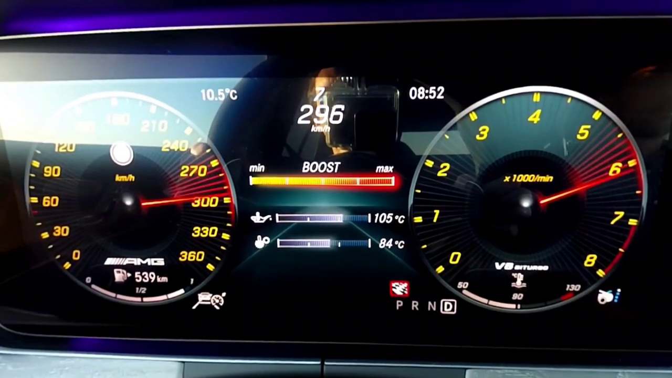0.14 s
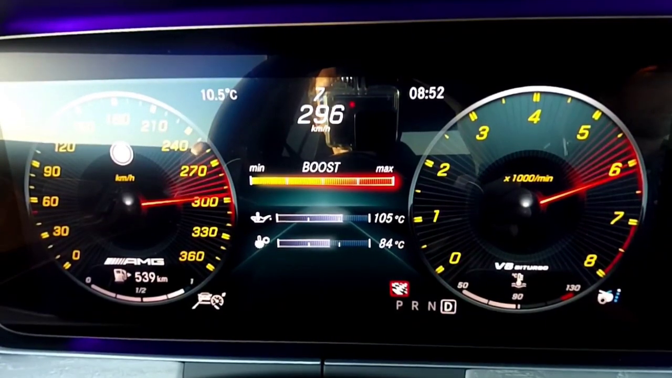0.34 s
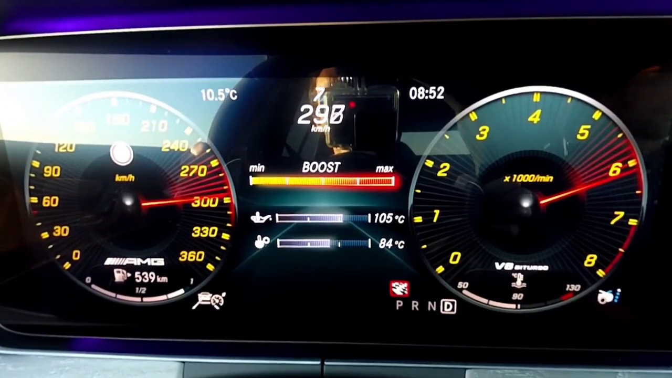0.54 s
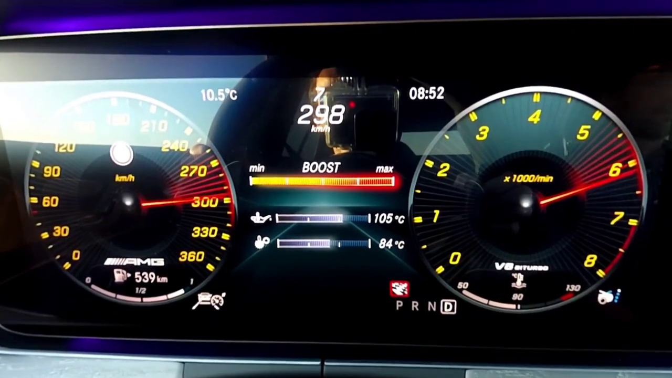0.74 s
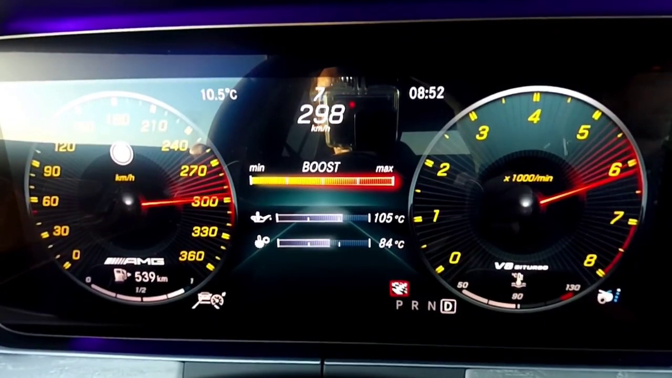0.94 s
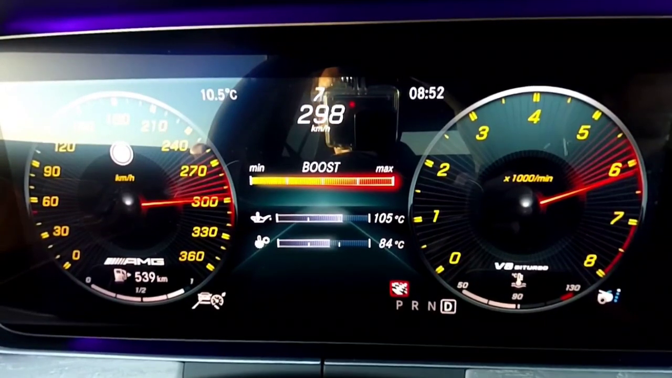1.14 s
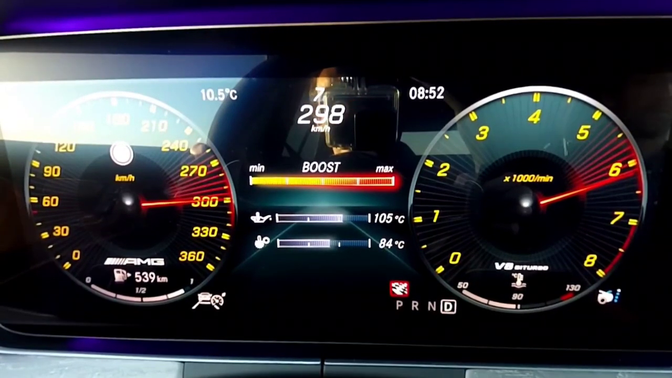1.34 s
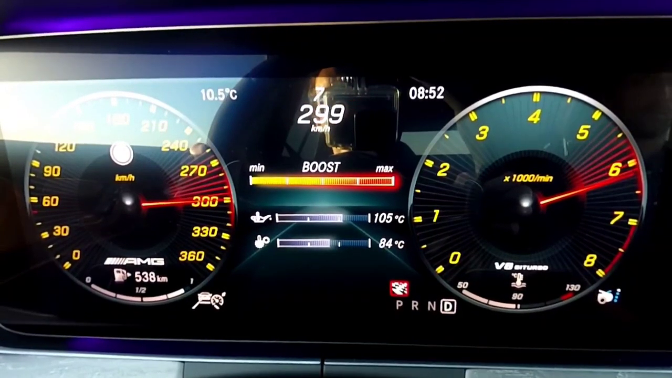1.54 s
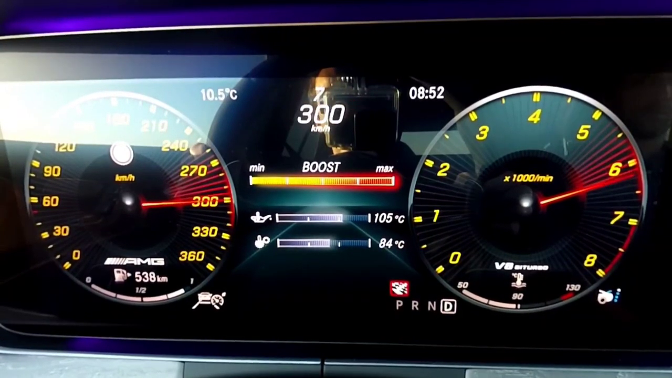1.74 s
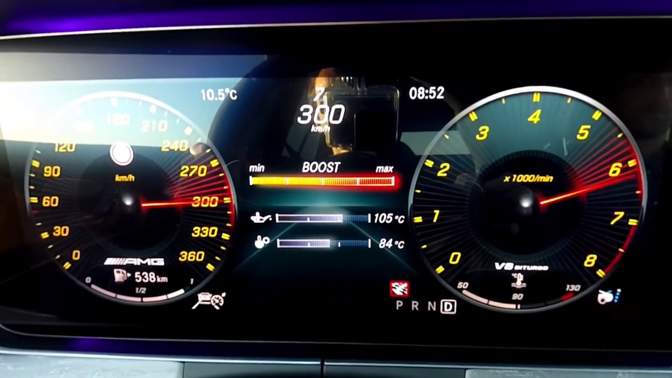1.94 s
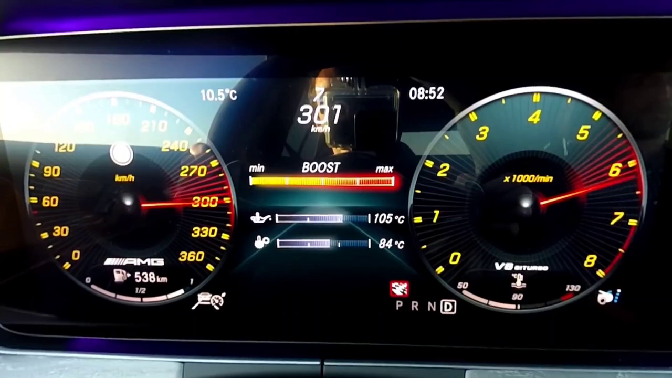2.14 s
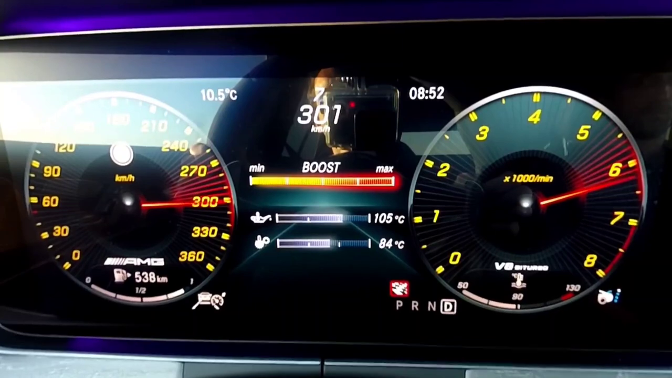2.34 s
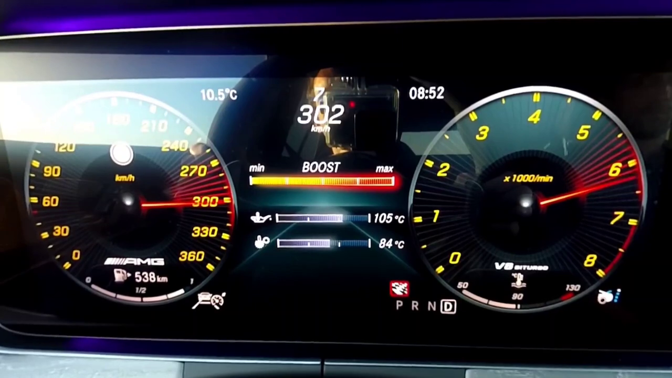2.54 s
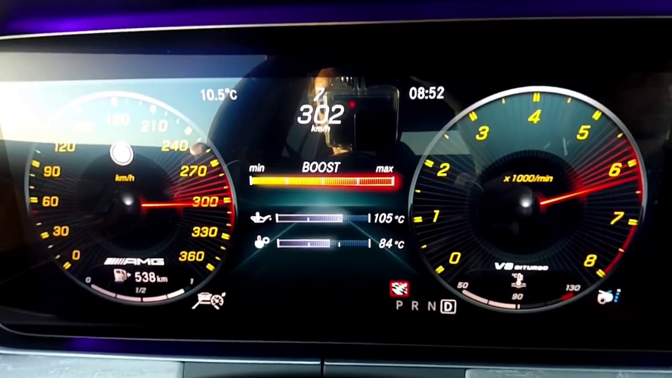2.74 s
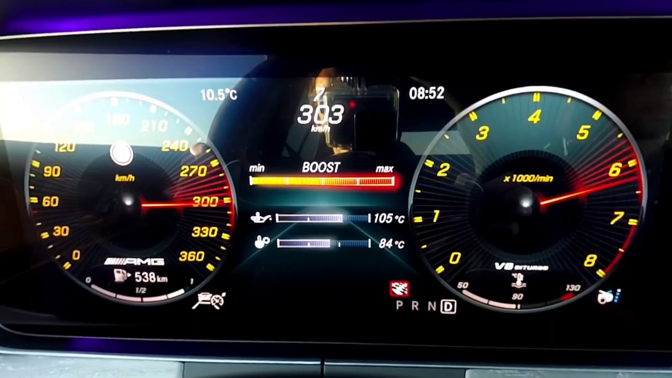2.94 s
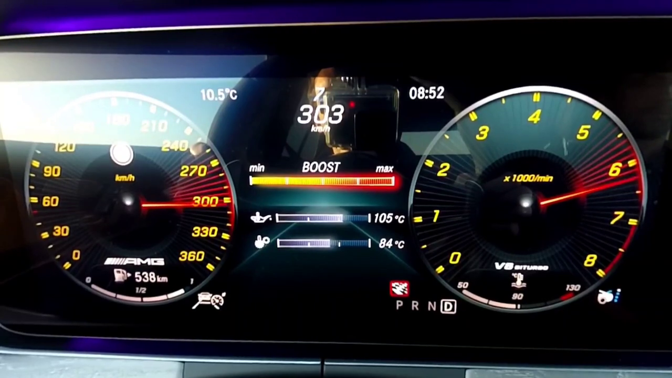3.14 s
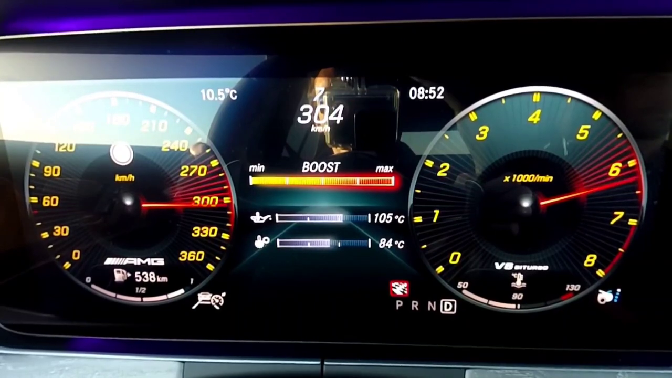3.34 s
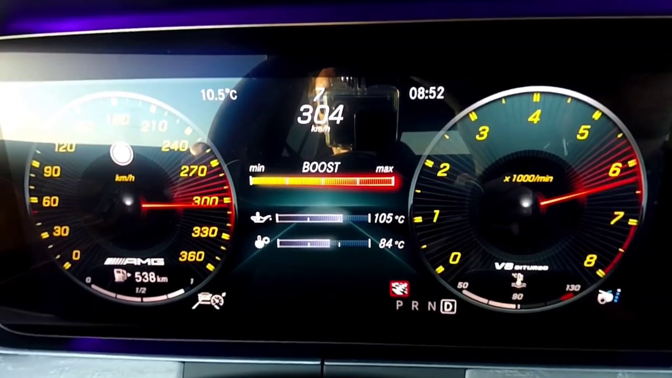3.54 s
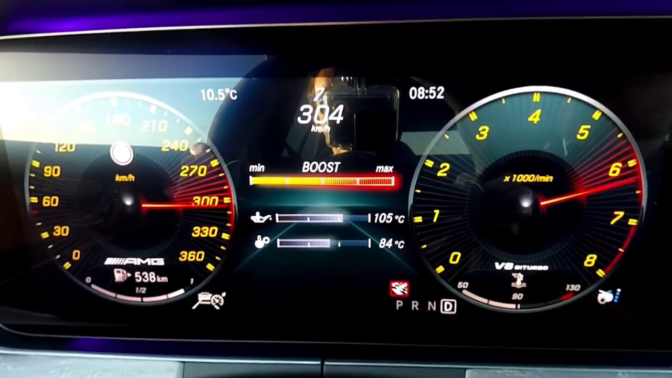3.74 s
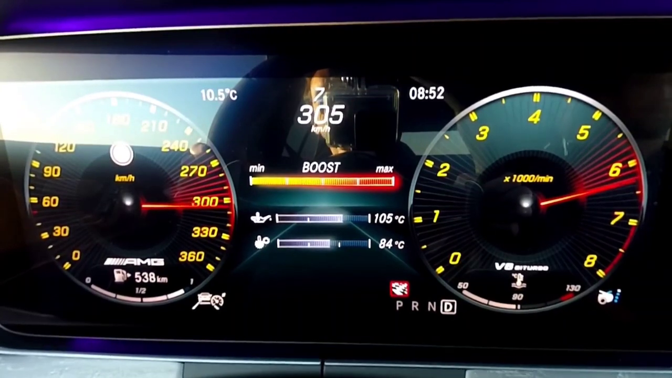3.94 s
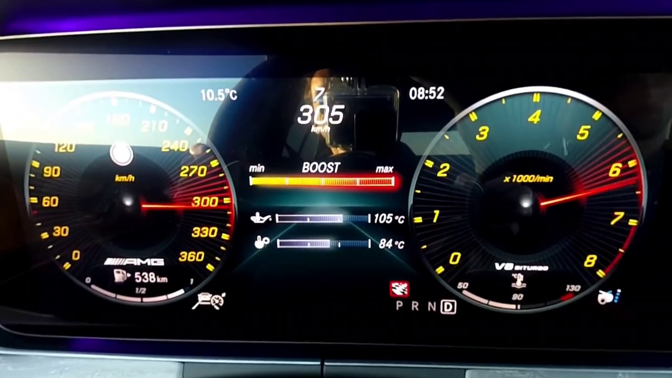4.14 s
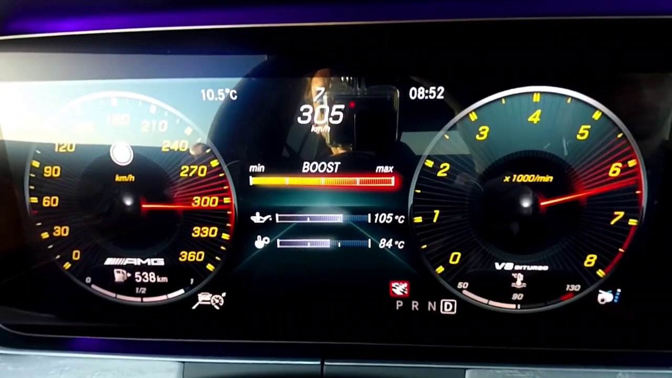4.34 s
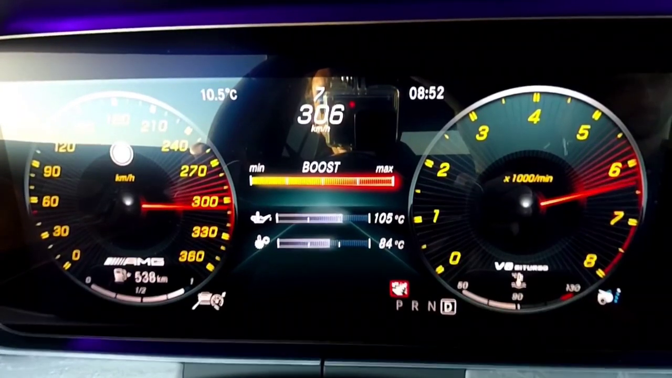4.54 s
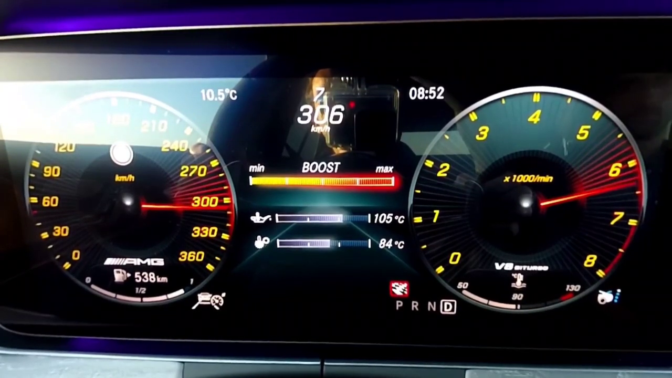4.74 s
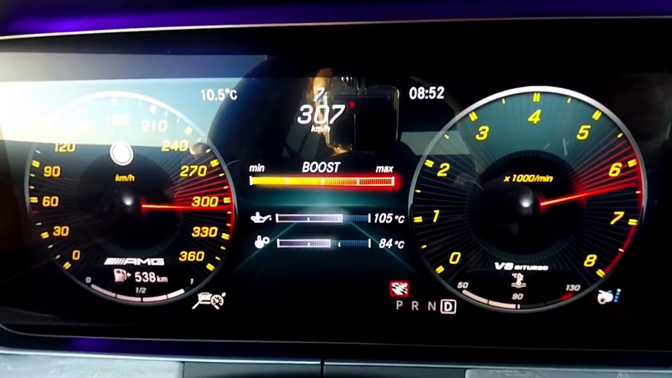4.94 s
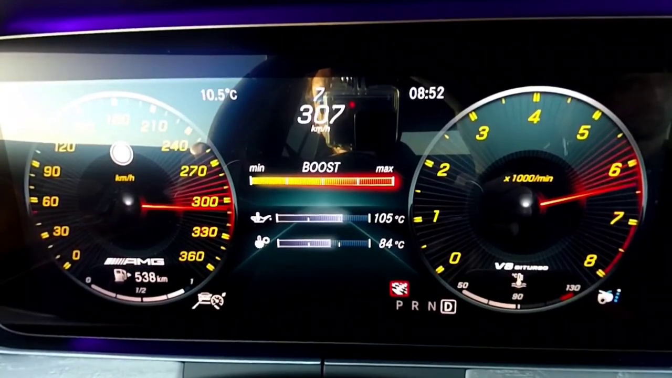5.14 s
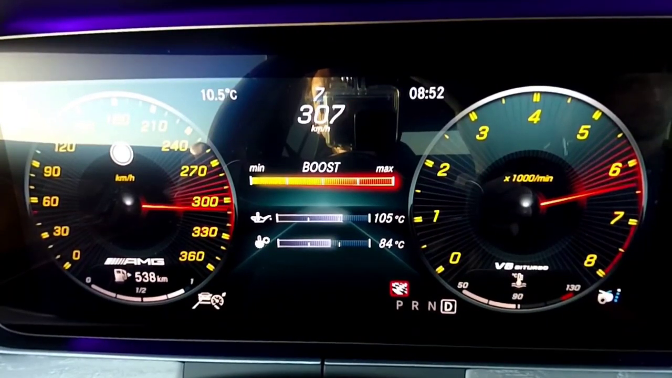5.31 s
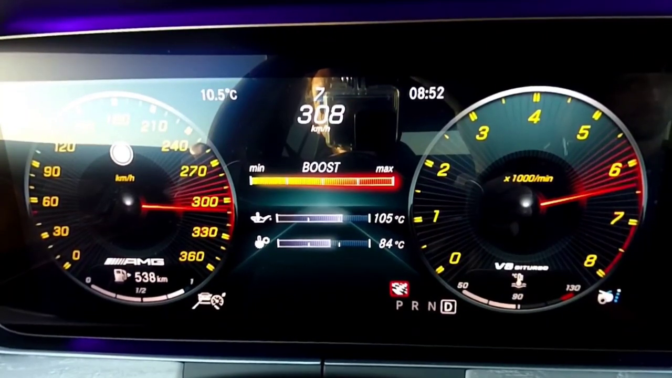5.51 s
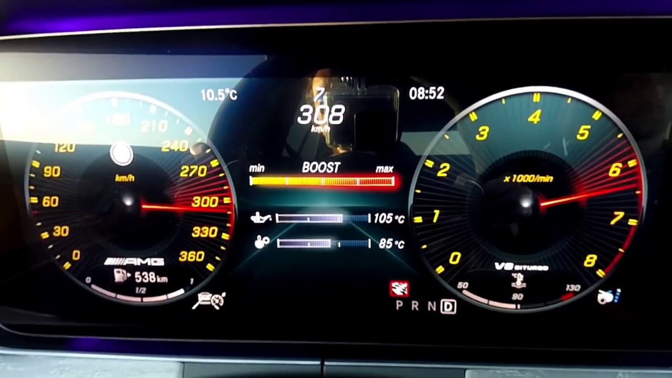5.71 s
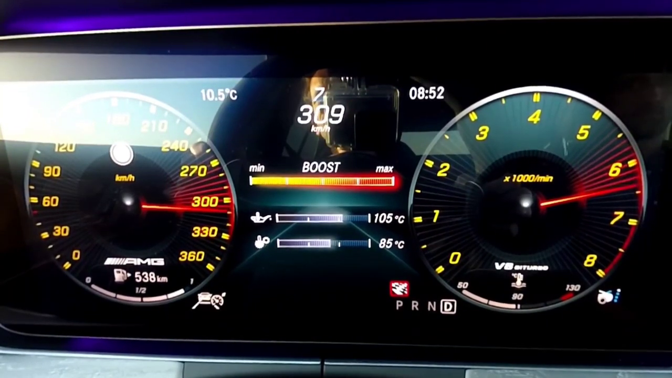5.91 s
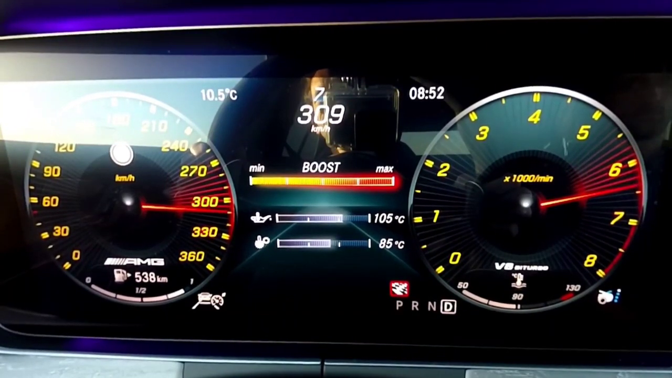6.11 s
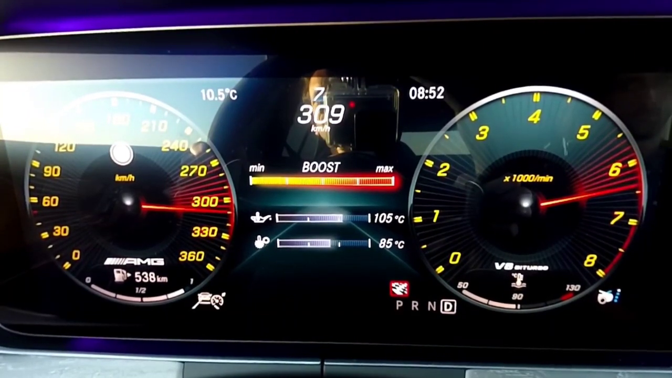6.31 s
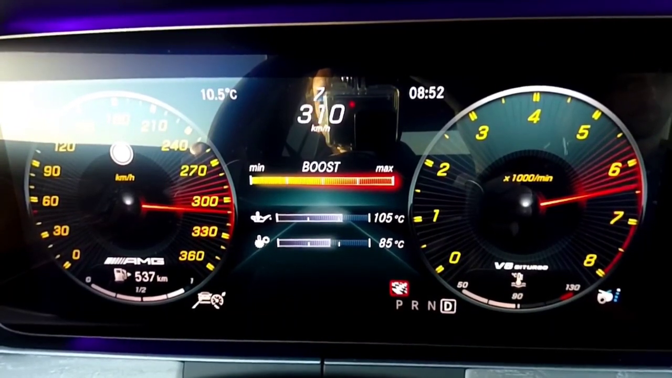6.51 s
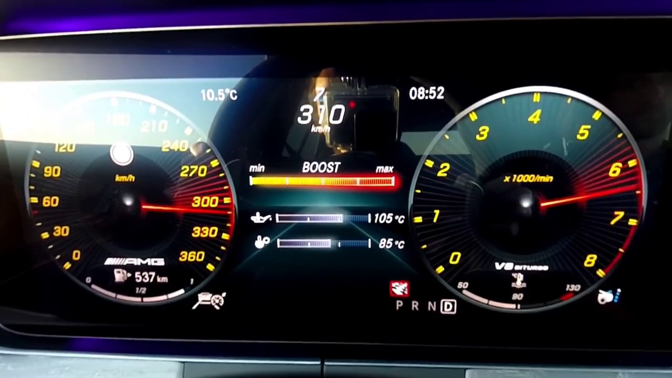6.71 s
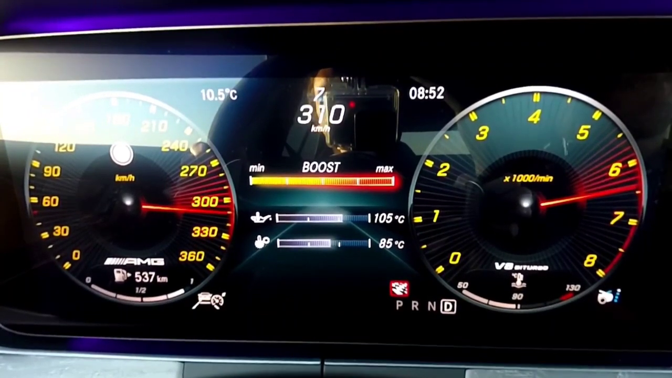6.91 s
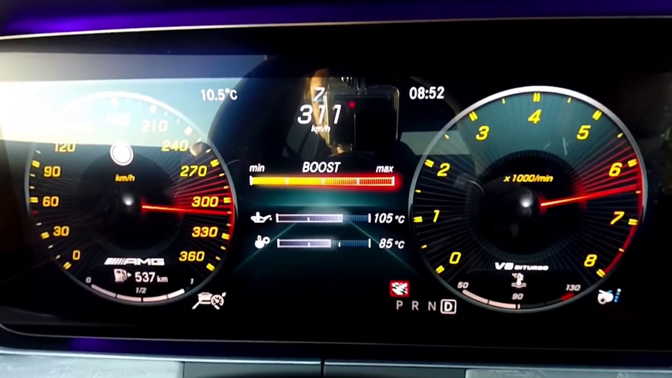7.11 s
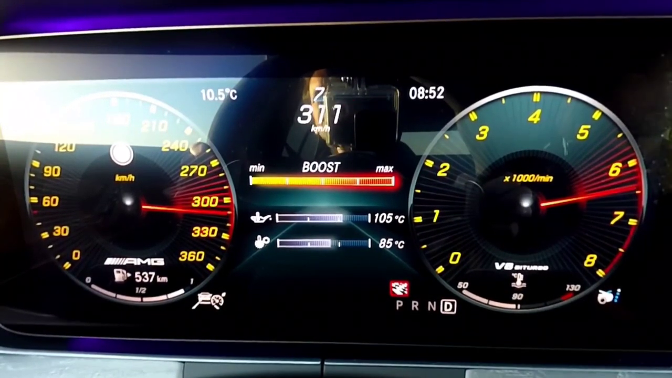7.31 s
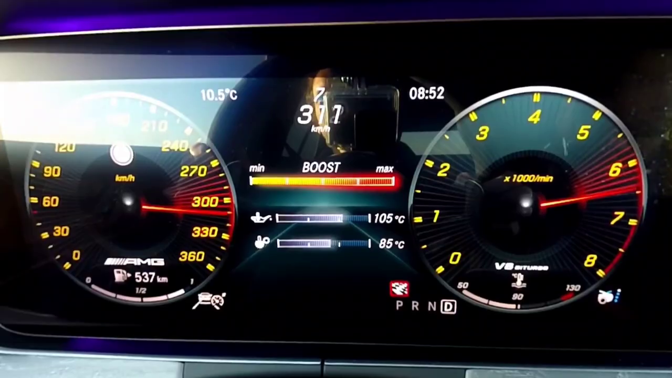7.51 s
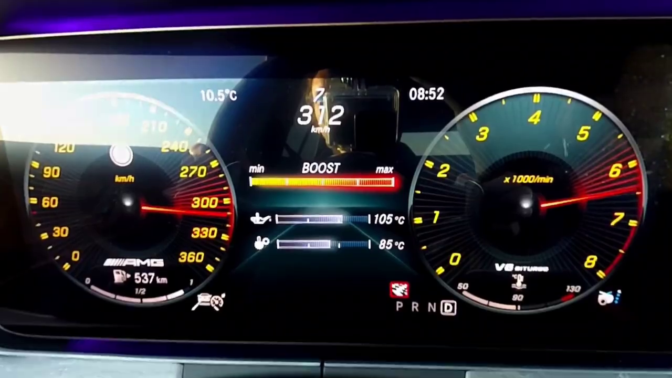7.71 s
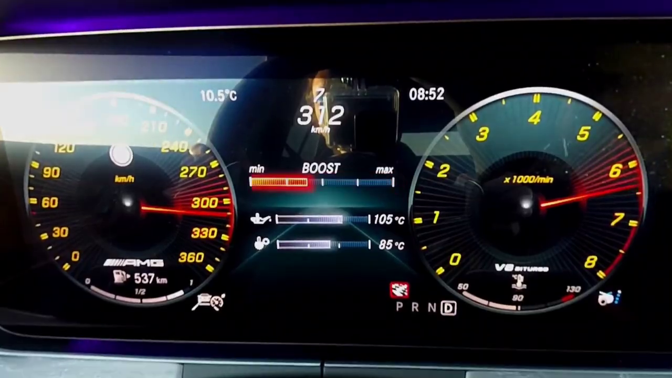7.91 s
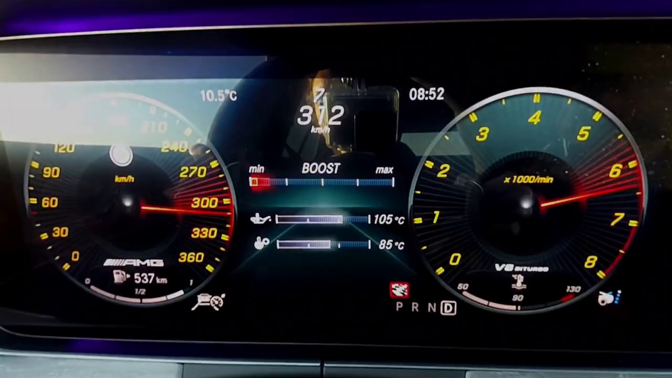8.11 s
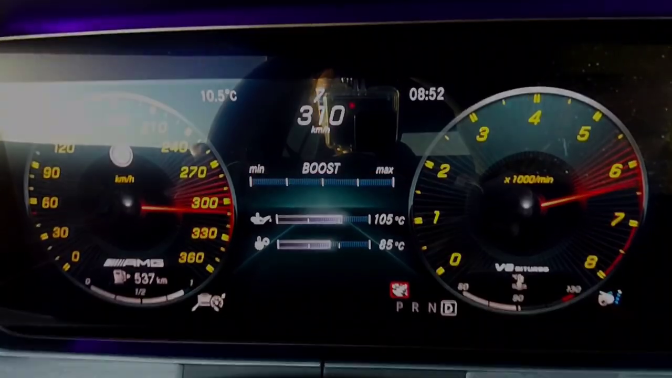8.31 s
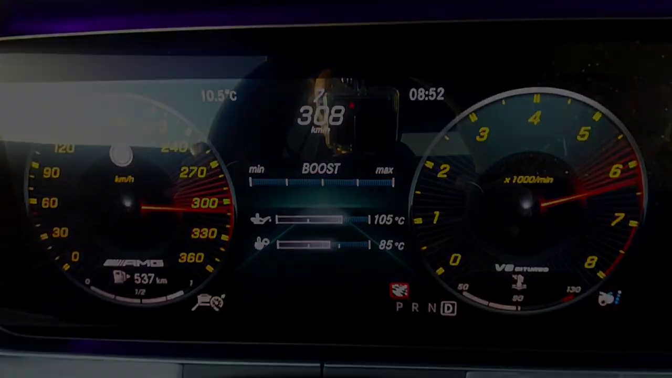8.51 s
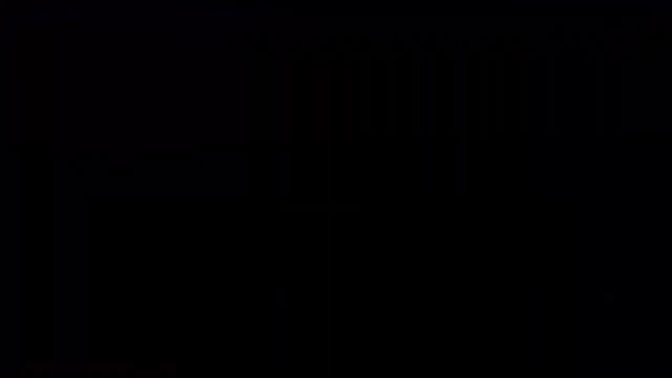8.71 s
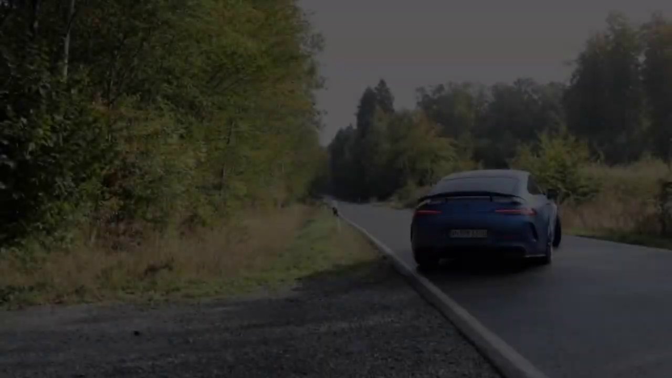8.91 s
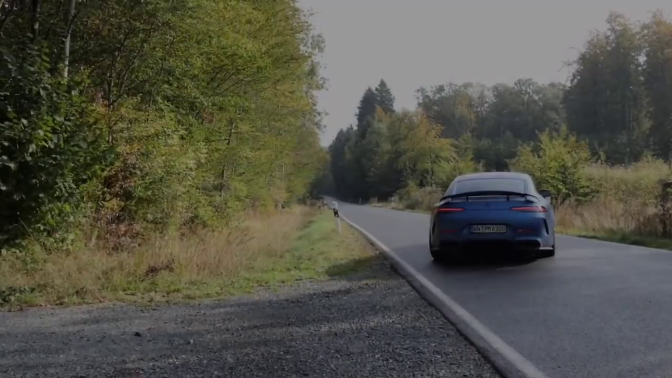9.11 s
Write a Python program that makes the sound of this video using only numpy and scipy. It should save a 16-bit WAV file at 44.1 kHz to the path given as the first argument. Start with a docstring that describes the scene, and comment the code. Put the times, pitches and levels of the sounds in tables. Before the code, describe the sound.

High-speed cabin roar with deep throbbing hum and wind hiss eases and fades; outside, tyre noise and low uneven exhaust swell.

```python
"""Fast coupe, then a roadside pass

Inside a V8 coupe at about 300 km/h, steady tones for exhaust, wheels and propeller shaft drone under
filtered noise for buffeting air, road roar and wind hiss. The driver lifts and the cabin fades out.
A roadside view fades in: a car at low revs grows louder, with tyre noise, uneven exhaust pulses,
muffled pops and short ticks of grit."""
import sys
import numpy as np
from scipy import signal
from scipy.fft import rfft, irfft, next_fast_len
from scipy.io import wavfile
from scipy.ndimage import uniform_filter1d

SR = 44100
rng = np.random.default_rng(int(sys.argv[2]) if len(sys.argv) > 2 else 0)


def wrap_up_sound(samples):
    """Save the sound to the file named by the first command line argument, as 16-bit audio."""
    columns = np.atleast_2d(samples).T
    # keep every value between -1 and 1, then stretch to whole-number steps
    tamed = np.clip(columns, -1, 1)
    steps = np.round(tamed * 32767).astype(np.int16)
    wavfile.write(sys.argv[1], SR, steps)


N = 403956
TIME = np.arange(N) / SR  # seconds

# Road speed. Each row: time in seconds, speed in km/h.
SPEED = [(0, 294.7), (1.1, 297.7), (2, 299.8), (3.5, 303.3), (5, 306.2), (6.5, 309), (7.7, 311), (8, 310),
         (8.75, 303)]
# Turns a second for each km/h: wheel, propeller shaft, four-stroke engine cycle in top gear.
WHEEL_RATE, SHAFT_RATE, CYCLE_RATE = .12188, .39967, .1728

# Exhaust tones. Each row: multiple of the engine cycle rate, level in dB rms before the cabin's lift.
EXHAUST_ORDERS = [(3, -36), (4, -35.5), (5, -37.5), (6, -45), (8, -40), (9, -43), (10, -47), (11, -47),
                  (12, -46), (13, -52), (14, -45), (15, -49), (16, -51), (17, -52), (18, -56.5), (20, -57)]
# Narrow cabin resonances and nulls. Each row: centre in Hz, width at half the lift in Hz, lift in dB.
CABIN_RESONANCES = [(292, 6, 6), (368.5, 7, 4.5), (414.5, 5, 3), (424, 6, 3), (428, 16, 9.5), (463, 4, 5),
                    (474, 4, -7), (483, 3, 7), (510, 4, 7), (532, 5, 7), (565, 8, 11), (571, 5, 9.5),
                    (583, 6, -7), (613, 5, 4), (631, 7, 7), (692, 15, 9.5), (735.5, 11, 11), (743, 7, -15),
                    (782, 9, 9), (822, 18, 9.5), (878, 7, 9), (886, 6, 8)]
# Boom at the wheel rate. Each row: time in seconds, level in dB before a small overall boost.
BOOM_LEVEL = [(0, -14.5), (.55, -14.5), (.9, -30), (1.2, -13.5), (1.4, -20), (1.7, -14), (1.9, -19),
              (2.15, -12), (2.45, -21), (2.8, -26), (3.25, -14), (4.3, -20.5), (4.85, -14.5), (5.4, -16),
              (5.82, -28), (5.98, -17.5), (6.65, -13.5), (6.8, -24), (6.95, -13), (7.2, -20.5),
              (7.55, -19.5), (7.9, -18), (8.6, -19.5)]
# Out-of-round tyres. Each row: multiple of the wheel rate, level in dB rms before the cabin's lift.
TYRE_ORDERS = [(2, -36), (6, -35.5), (8, -40.5), (10, -39)]
# Propeller shaft's hum. Each row: time in seconds, level in dB before a small overall boost.
HUM_LEVEL = [(0.0, -22), (0.55, -29), (0.8, -17.5), (1.85, -26.5), (2.0, -21.5), (2.25, -24), (2.55, -18),
             (2.7, -31.5), (2.8, -19), (3.15, -19.3), (3.55, -25.4), (3.8, -19), (5.25, -21), (5.5, -31),
             (5.6, -32), (5.75, -23.5), (5.95, -33), (6.05, -23.5), (6.45, -24), (6.9, -19), (7.1, -26),
             (7.5, -23.5)]

# Swells of the deep rumble of the buffeting. Each row: time in seconds, change in dB.
RUMBLE_SWELL = [(0, -0.5), (.5, -2.5), (.75, 1), (1.35, -2), (1.55, 3), (1.7, -.2), (2.1, 1), (2.3, -2.5),
                (2.8, 2), (3.65, -3.5), (3.85, 1.2), (5.35, 0.5), (5.5, 3), (5.65, -2.5), (5.8, 3),
                (6.15, 0), (6.4, 1.5), (7.5, 0), (7.72, -4.5), (8, 1.7), (8.5, 1.5)]
# Swells of the upper bass of the buffeting. Each row: time in seconds, change in dB.
UPPER_BASS_SWELL = [(0, 0), (.35, -0.3), (.5, -10), (.75, 2), (1.3, 0), (2.4, 2), (2.55, -2), (2.7, 0.5),
                    (3.3, -0.1), (4.2, 0.5), (4.7, .8), (4.85, -2.5), (5.75, 2), (6.05, 0), (6.2, -1.5),
                    (6.4, -0.5), (7.1, .3), (7.45, 1), (7.7, 0)]
# Road roar, which surges with the surface. Each row: time in seconds, change in dB.
ROAR_SURGE = [(0, -1), (.25, -0.8), (.5, -2.5), (.7, 1.5), (.85, -1.5), (1.1, .7), (1.5, 0), (1.7, 2.5),
              (1.78, -1.5), (2, -0.1), (2.45, 2.1), (2.55, -1.5), (2.78, 1.3), (2.95, 0.3), (3.5, -.4),
              (4.35, .8), (4.8, -0.1), (5.15, -.8), (5.75, 1), (5.88, 2), (6, 1.7), (6.35, 0.2),
              (6.75, 3.5), (6.95, 0), (7.25, 1.4), (7.52, -0.5), (7.8, 1), (8.4, -0.5)]
# Rush of air, which swells and eases with the gusts. Each row: time in seconds, strength in dB.
WIND_STRENGTH = [(0, -0.5), (.46, -2.5), (.8, -0.1), (1.1, 0.7), (2.1, -0.1), (3.1, 0.3), (3.45, -1),
                 (3.8, 0.2), (4.2, 1), (5.15, -1.2), (5.7, 1), (6.9, 1), (7.35, 1.4), (7.7, -1.2)]
# Brief dips of the whole cabin. Each row: start in seconds, depth setting in dB, recovery in seconds.
CABIN_DIPS = [(2.2, -1.7, 0.18), (3.135, -3, 0.2), (4.43, -2.5, 0.11), (4.811, -2, 0.22), (5.1, -1.2, .15),
              (6.555, -3, 0.11), (7.64, -1.5, 0.047), (7.865, -7, 0.033), (8.05, -3.5, .1)]

# Tone colour of the deep rumble. Each row: frequency in Hz, relative level in dB.
RUMBLE_COLOUR = [(6, -25), (12, -14), (20, -6), (31, -.5), (55, -1), (100, -4.5), (125, -11.5), (160, -26),
                 (400, -79), (2000, -120)]
# Tone colour of the upper bass. Each row: frequency in Hz, relative level in dB.
UPPER_BASS_COLOUR = [(40, -45), (95, -10), (135, -0.5), (165, -0.5), (215, -5.5), (250, -9), (290, -7),
                     (370, -13.5), (450, -28), (800, -45.5), (2000, -82)]
# Tone colour of road roar through the floor. Each row: frequency in Hz, relative level in dB.
ROAD_COLOUR = [(100, -33), (300, -10), (420, -1), (500, -2), (590, 0), (700, -4.5), (860, -6), (930, -11),
               (1000, -15.5), (1250, -24), (1500, -34.5), (2500, -60), (6000, -84)]
# Tone colour of wind at the window seals. Each row: frequency in Hz, relative level in dB.
SEAL_COLOUR = [(700, -23), (1500, -6), (2000, 0.2), (2400, -3), (2800, -2), (3400, -6), (4300, -10.5),
               (5500, -12), (6500, -17), (6950, -22.5), (8500, -24.5), (9400, -24), (11500, -38.5),
               (15000, -66.5)]
# Tone colour of tyre roar at the roadside. Each row: frequency in Hz, relative level in dB.
TYRE_COLOUR = [(12, -40), (30, -13), (60, 1.5), (110, -1.5), (200, -5.5), (370, -9), (450, -5), (650, -4.5),
               (770, -9), (950, -10.5), (1150, -17), (1500, -15), (1800, -24), (2500, -31), (8000, -75)]
# Tone colour of the tailpipe. Each row: frequency in Hz, relative level in dB.
TAILPIPE_COLOUR = [(30, -25), (80, 2), (135, -8), (200, -15), (275, -0.5), (360, -19), (460, 3), (620, 2),
                   (760, -14), (950, -11), (1400, -16), (2000, -33), (6000, -70)]
# Tone colour of tread sizzle and grit. Each row: frequency in Hz, relative level in dB.
TREAD_COLOUR = [(1000, -8), (2400, -2), (3200, 1), (5500, 0.5), (7800, -7.5), (9500, -5), (10500, -12),
                (13000, -14), (15500, -21)]

# Muffled exhaust pops, one just after the throttle shuts and the rest from the passing car.
# Each row: start in seconds, height of the swell in dB, pitch in Hz.
EXHAUST_POPS = [(7.951, -21, 443), (9.059, -28, 640), (9.098, -21.5, 460), (9.110, -24, 400),
                (9.127, -21, 545), (9.150, -24, 560)]
# Eight firings of a cycle at low revs, uneven between the banks. Each entry: relative size in dB.
FIRING_SIZES = [0, -7, -2, 0, -8, -1, -6, -4]
# Grit flicked by the tread. Each row: start in seconds, starting level in dB.
GRIT_TICKS = [(8.997, -47), (9.029, -36), (9.059, -41), (9.074, -37), (9.107, -41), (9.132, -37)]

LIFT_S, LIFT_LENGTH_S = 7.57, 0.15  # the driver comes off the throttle: start and length, seconds
CUT_S = 8.755  # the cabin is silent from here, and the roadside starts, seconds
FADE_OUT_S, FADE_IN_S = 0.92, 0.44  # lengths of the fades, seconds
PASS_SWELL_DB = 6.5  # the passing car also grows by this much during its fade-in


def gain(db):
    """Turn decibels into a multiplier."""
    return 10 ** (np.asarray(db) / 20)


def curves(table):
    """Join each column of a table by straight lines in time."""
    seconds, *columns = np.transpose(table)
    return [np.interp(TIME, seconds, column) for column in columns]


def ramp(start_s, length_s):
    """Rise in a straight line from 0 to 1."""
    return np.clip((TIME - start_s) / length_s, 0, 1)


def walk(rate):
    """Wander smoothly among random levels, with about this many new ones a second and a spread of 1."""
    hold = max(int(SR / rate), 1)
    held = np.repeat(rng.standard_normal(N // hold + 1), hold)
    once = uniform_filter1d(held, hold)
    smooth = uniform_filter1d(once, hold)[:N]
    return smooth / smooth.std()


def colour(sound, points):
    """Shape the spectrum by (Hz, dB) points, then set the rms to 1."""
    size = next_fast_len(N)
    hz, db = np.transpose(points)
    bins_hz = np.maximum(np.arange(size // 2 + 1) * SR / size, 1)
    bins_db = np.interp(np.log(bins_hz), np.log(hz), db)
    shaped = irfft(rfft(sound, size) * gain(bins_db), size)[:N]
    return shaped / shaped.std()


def turbulence(points, flutter_db, flutter_rate):
    """Make eddies: noise whose strength flutters, coloured by the path that it takes."""
    strength = gain(flutter_db * walk(flutter_rate))
    return colour(rng.standard_normal(N) * strength, points)


def turning(rate):
    """Add up the angle, in radians, of a part that makes this many turns a second."""
    return 2 * np.pi * np.cumsum(rate) / SR


def partial(angle, rough, rough_rate):
    """Make one tone of rms 1, shaken in size and timing; its path to the ear sets its own phase."""
    angle = angle + 2 * np.pi * rng.random()
    size = 1 + rough * walk(rough_rate)
    sideways = rough * walk(rough_rate)
    tone = size * np.sin(angle) + sideways * np.cos(angle)
    return tone / tone.std()


def cabin_lift(hz):
    """Sum the decibels that the cabin's resonances and nulls add to a tone at this pitch."""
    return sum(db / (1 + (2 * (hz - centre) / width) ** 2) for centre, width, db in CABIN_RESONANCES)


def engine(kmh, lift, lift_db=-10):
    """Eight firings a cycle make the main drone; the uneven banks fill in the other orders."""
    rate = CYCLE_RATE * kmh
    cycle = turning(rate)
    drone = 0
    for order, db in EXHAUST_ORDERS:
        rough = .05 if order == 8 else .08  # the firing order is the steadiest
        tone = partial(order * cycle, rough, rough_rate=4)
        drone = drone + gain(db + cabin_lift(order * rate)) * tone
    return gain(lift_db * lift) * drone


def wheels(kmh, boost_db=0.5):
    """Slight unbalance in the wheels shakes the body once a turn."""
    boom_db, = curves(BOOM_LEVEL)
    boom = partial(turning(WHEEL_RATE * kmh), rough=.07, rough_rate=7)
    return gain(boom_db + boost_db) * boom


def thrum(kmh, lift, lift_db=-4):
    """Out-of-round tyres thrum at multiples of the wheel rate, louder where the cabin resonates."""
    rate = WHEEL_RATE * kmh
    angle = turning(rate)
    total = 0
    for order, db in TYRE_ORDERS:
        tone = partial(order * angle, rough=0.56, rough_rate=8)
        total = total + gain(db + cabin_lift(order * rate)) * tone
    return gain(lift_db * lift) * total


def shaft(kmh, lift, boost_db=1.03, lift_db=-10):
    """The propeller shaft hums once a turn and quietens when the torque comes off."""
    hum_db, = curves(HUM_LEVEL)
    hum = partial(turning(SHAFT_RATE * kmh), rough=.1, rough_rate=10)
    return gain(hum_db + boost_db + lift_db * lift) * hum


def buffet(lift, rumble_db=-17, upper_db=-20, lift_db=-5):
    """Air buffets the panels; its deep rumble and its upper bass swell separately."""
    deep_db, = curves(RUMBLE_SWELL)
    high_db, = curves(UPPER_BASS_SWELL)
    rumble = turbulence(RUMBLE_COLOUR, flutter_db=0.13, flutter_rate=27)
    upper = turbulence(UPPER_BASS_COLOUR, flutter_db=0.02, flutter_rate=20)
    both = gain(rumble_db + deep_db) * rumble + gain(upper_db + high_db) * upper
    return gain(lift_db * lift) * both


def road(lift, road_db=-26.5, lift_db=-4.5):
    """Tyres roar through the floor, in surges."""
    surge_db, = curves(ROAR_SURGE)
    roar = turbulence(ROAD_COLOUR, flutter_db=0.84, flutter_rate=70)
    return gain(road_db + lift_db * lift + surge_db) * roar


def reflections(sound, share_db, decay_s, count=40):
    """Early echoes off glass and trim ripple the spectrum; the result has an rms of 1."""
    delay_s = rng.uniform(.0005, .025, count)
    sizes = rng.choice([-1, 1], count) * np.exp(-delay_s / decay_s)
    echoes = np.bincount((delay_s * SR).astype(int), sizes / np.linalg.norm(sizes))
    mixed = sound + gain(share_db) * signal.fftconvolve(sound, echoes)[:N]
    return mixed / mixed.std()


def seals(lift, gust_db, hiss_db=-45.5, lift_db=-3, gust_share=0.8):
    """Wind hisses at the window seals, swells with the gusts and echoes off the glass."""
    eddies = turbulence(SEAL_COLOUR, flutter_db=0.74, flutter_rate=80)
    hiss = reflections(eddies, share_db=-16, decay_s=.012)
    return gain(hiss_db + lift_db * lift + gust_share * gust_db) * hiss


def dips(fall_s=0.012):
    """The level drops quickly at each dip and creeps back."""
    db = 0
    for start_s, depth_db, recovery_s in CABIN_DIPS:
        creep_back = np.exp(-np.abs(TIME - start_s) / recovery_s)
        db = db + depth_db * ramp(start_s, fall_s) * creep_back
    return gain(db)


def cabin():
    """Speed sets every tone's pitch; coming off the throttle eases every level but the wheels' boom."""
    kmh, = curves(SPEED)
    gust_db, = curves(WIND_STRENGTH)
    lift = ramp(LIFT_S, LIFT_LENGTH_S)  # 0 on the throttle, 1 off it
    machinery = engine(kmh, lift) + wheels(kmh) + thrum(kmh, lift) + shaft(kmh, lift)
    rush = buffet(lift) + road(lift) + seals(lift, gust_db)
    return dips() * (machinery + rush)


def pops(decay_s=.0018):
    """Each puff of gas rings the exhaust for a few cycles."""
    total = 0
    for start_s, db, hz in EXHAUST_POPS:
        age = np.maximum(TIME - start_s, 0)
        swell = age / decay_s * np.exp(1 - age / decay_s)  # rises to 1, then dies away
        total = total + gain(db) * swell * np.sin(2 * np.pi * hz * age)
    return total


def burble(cycle_hz=17.1):
    """Uneven firings at low revs, each a little off in time and size, thump in the tailpipe."""
    firing_hz = cycle_hz * len(FIRING_SIZES)
    count = int(TIME[-1] * firing_hz)
    late, size = rng.standard_normal((count, 2)).T
    seconds = np.arange(count) / firing_hz + .0004 * late
    db = np.resize(FIRING_SIZES, count) + 2.5 * size
    places = np.clip(seconds * SR, 0, N - 1).astype(int)
    return colour(np.bincount(places, gain(db), N), TAILPIPE_COLOUR)


def roadside(roar_db=-29, exhaust_db=-32, hiss_db=-47):
    """Tyres roar and sizzle on the asphalt over the exhaust's burble."""
    roar = turbulence(TYRE_COLOUR, flutter_db=0.5, flutter_rate=100)
    sizzle = turbulence(TREAD_COLOUR, flutter_db=2, flutter_rate=900)
    return gain(roar_db) * roar + gain(exhaust_db) * burble() + gain(hiss_db) * sizzle


def grit(decay_s=.0007):
    """Each stone gives one short, bright tick of fading noise."""
    bursts = np.zeros(N)
    for start_s, db in GRIT_TICKS:
        age = TIME - start_s
        bursts += gain(db) * (age >= 0) * np.exp(-np.abs(age) / decay_s)
    return bursts * colour(rng.standard_normal(N), TREAD_COLOUR)


def scene():
    """The cabin fades out, then the roadside fades in and grows; pops and grit stand outside the fades."""
    fade_out = 1 - ramp(CUT_S - FADE_OUT_S, FADE_OUT_S)
    fade_in = ramp(CUT_S, FADE_IN_S)
    swell = gain(PASS_SWELL_DB * (fade_in - 1))
    inside = fade_out * cabin()
    outside = fade_in * swell * roadside()
    return (inside + pops() + outside + grit())[None]


def record(dry, ceiling=.84, top_hz=15500):
    """The recorder rounds the tallest peaks towards a ceiling and cuts the top of the treble."""
    rounded = dry / (1 + (dry / ceiling) ** 6) ** (1 / 6)
    lowpass = signal.ellip(8, .2, 70, top_hz, fs=SR, output="sos")
    return signal.sosfilt(lowpass, rounded)


dry = scene()
out = record(dry)
wrap_up_sound(out)
```